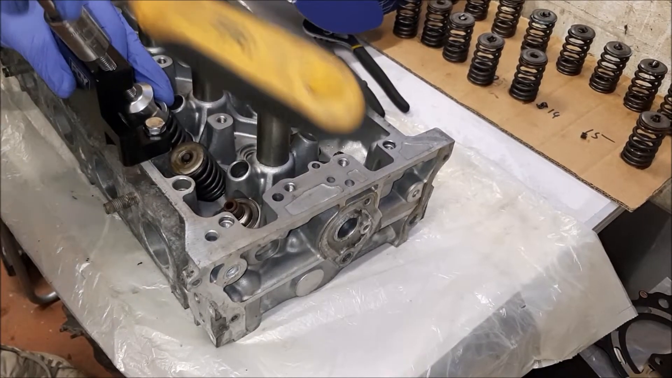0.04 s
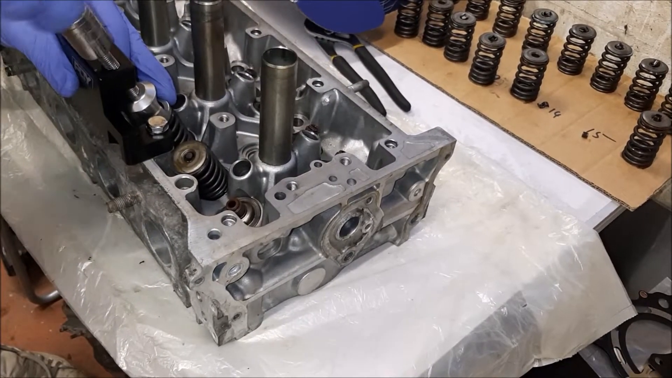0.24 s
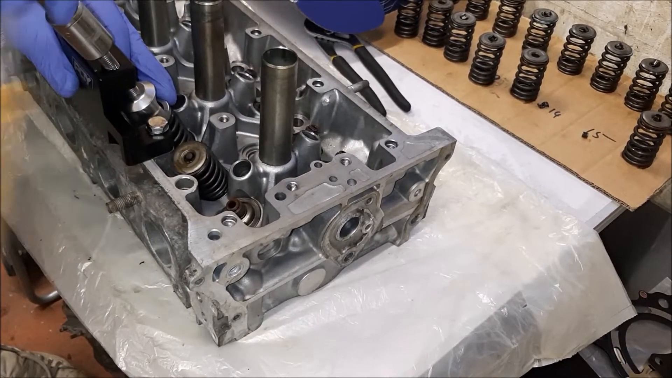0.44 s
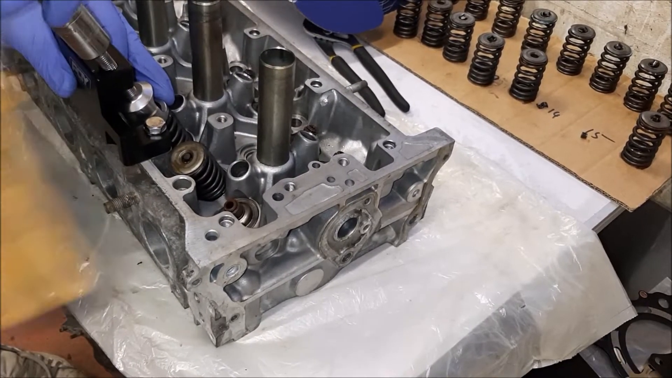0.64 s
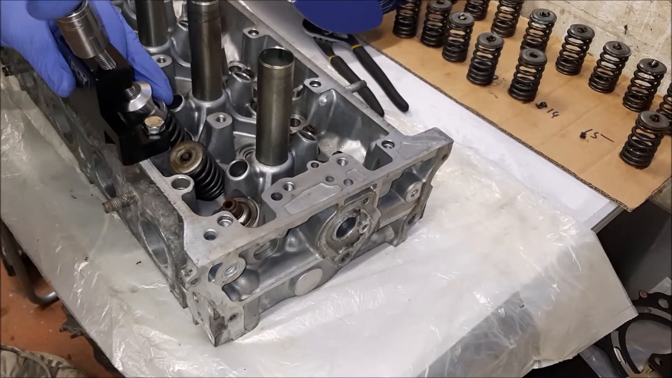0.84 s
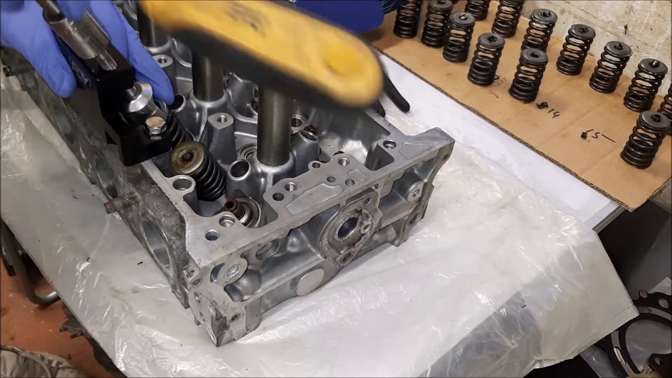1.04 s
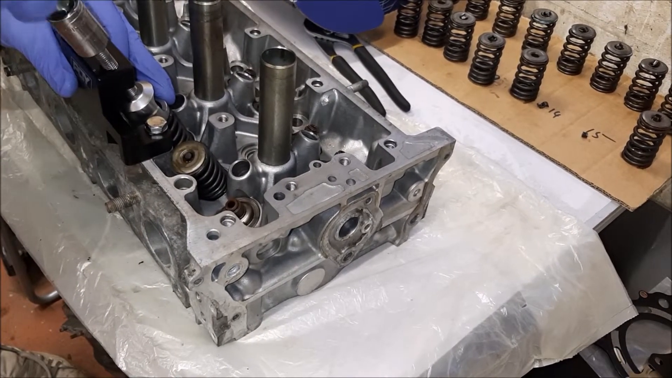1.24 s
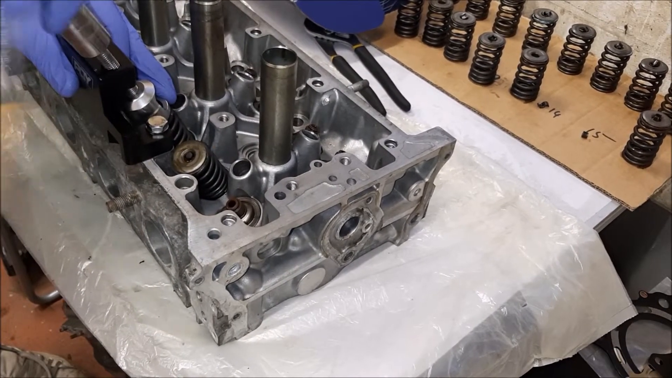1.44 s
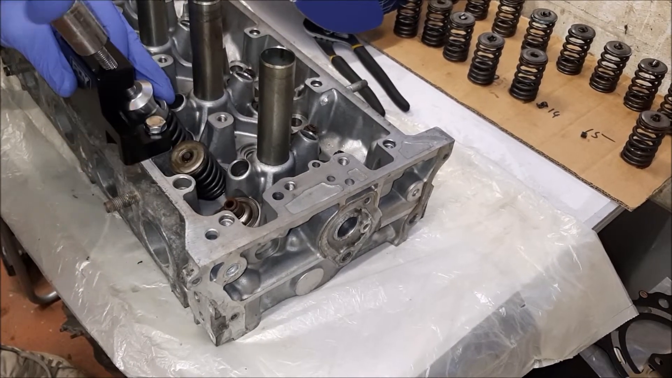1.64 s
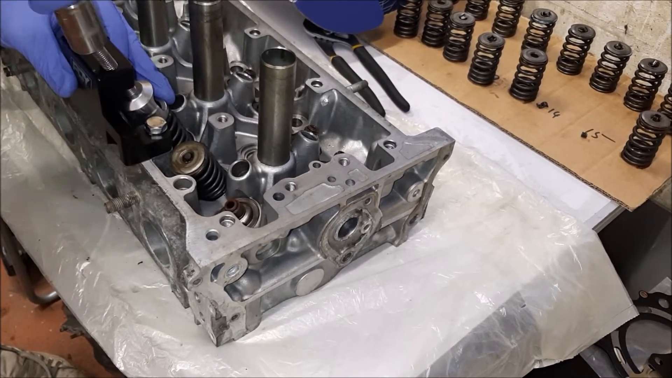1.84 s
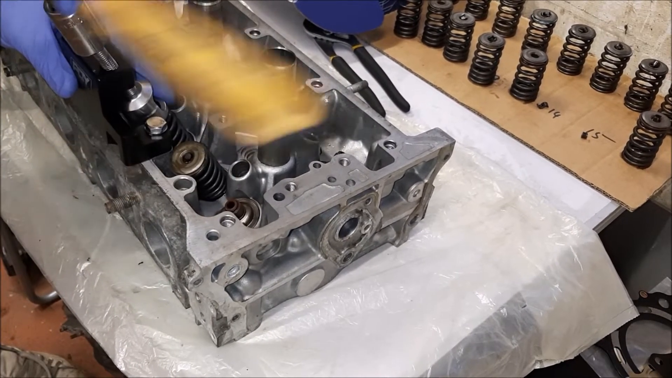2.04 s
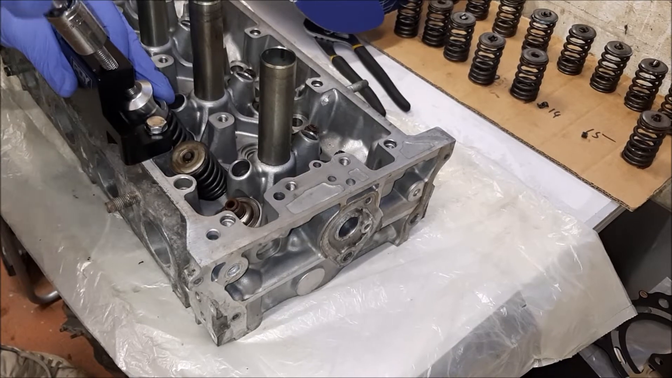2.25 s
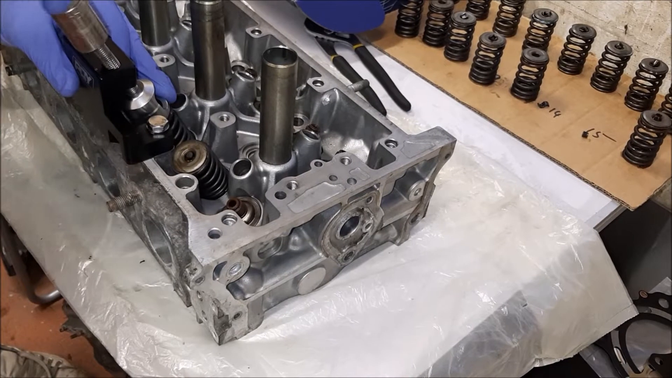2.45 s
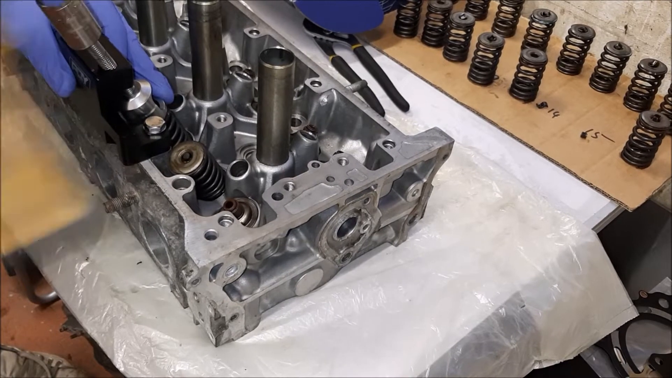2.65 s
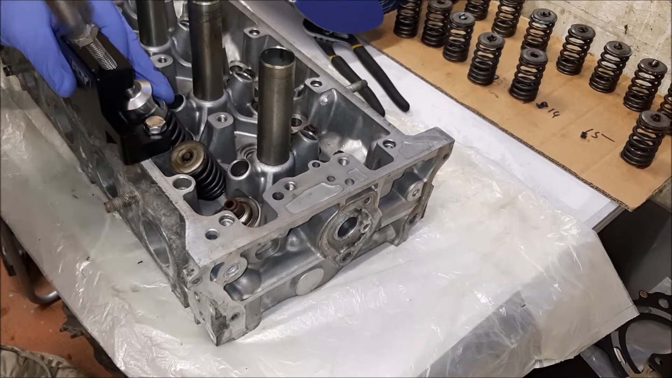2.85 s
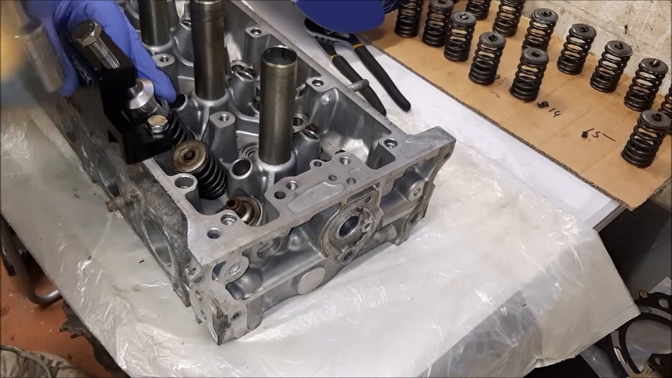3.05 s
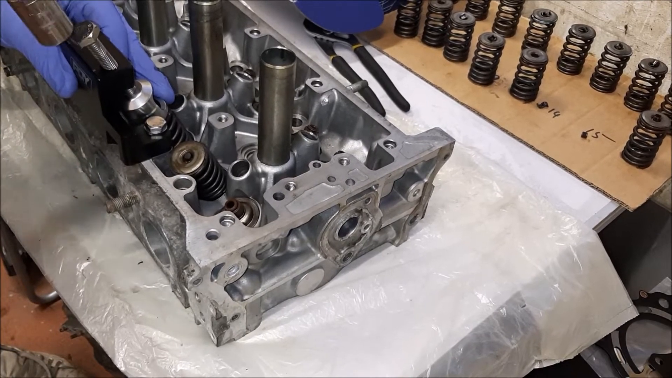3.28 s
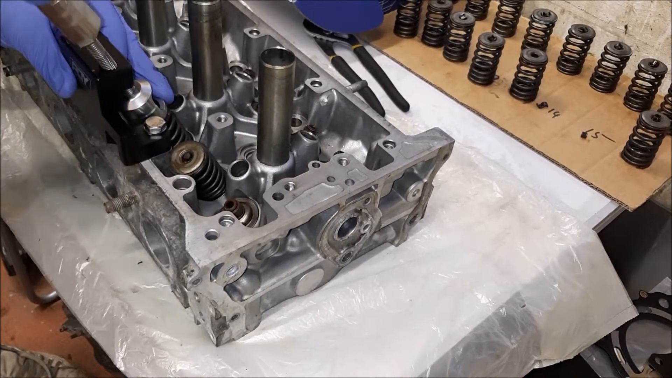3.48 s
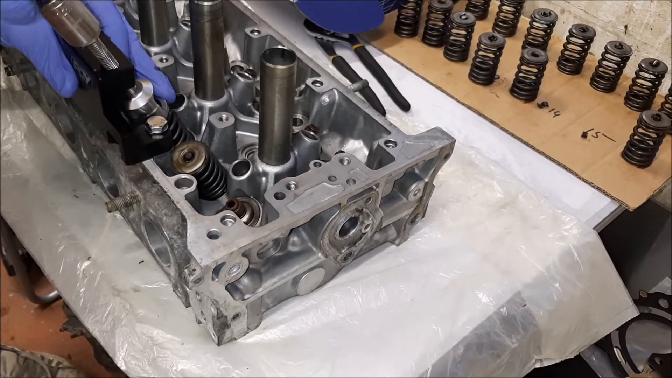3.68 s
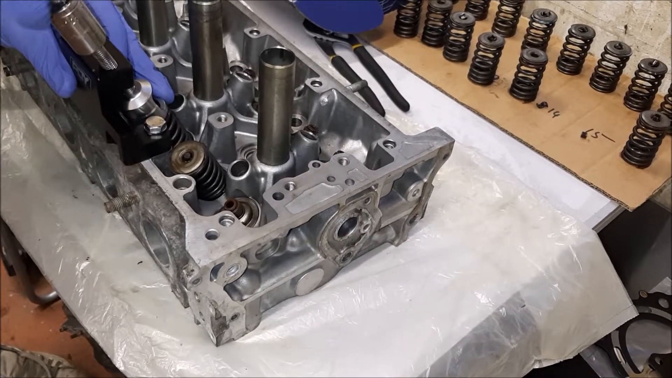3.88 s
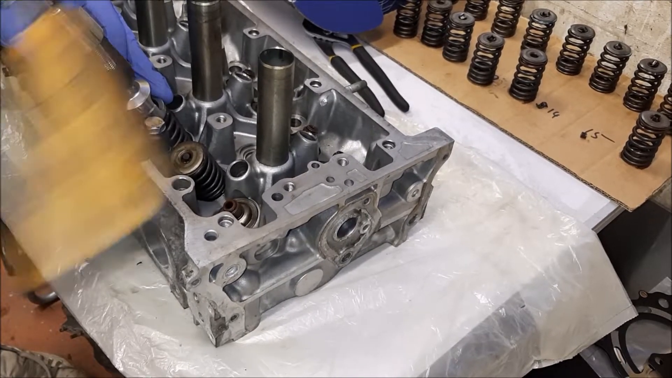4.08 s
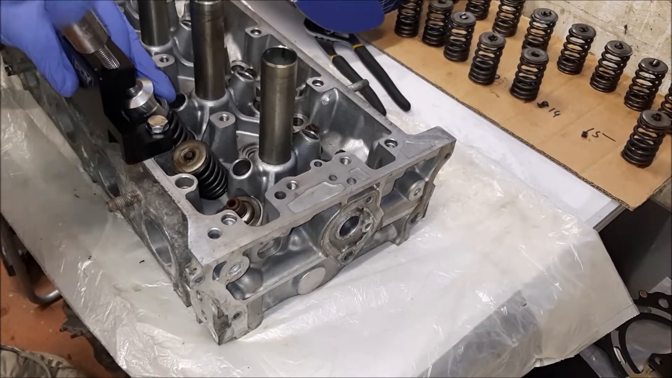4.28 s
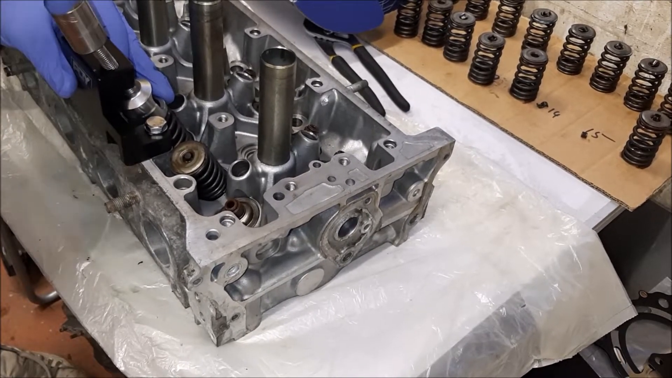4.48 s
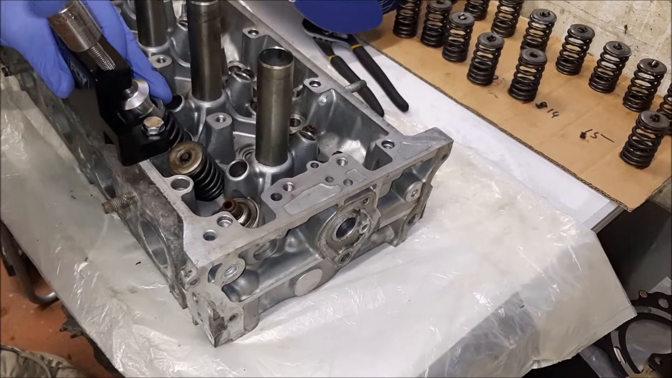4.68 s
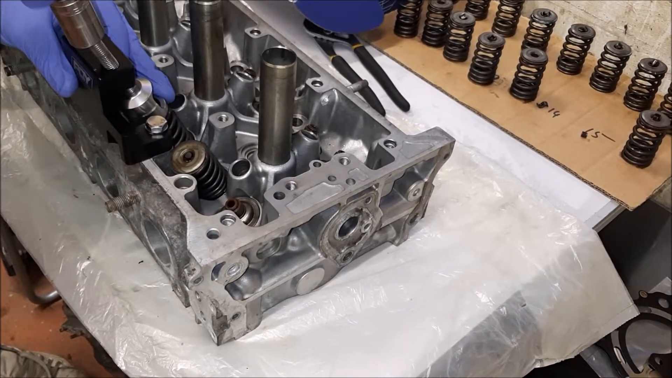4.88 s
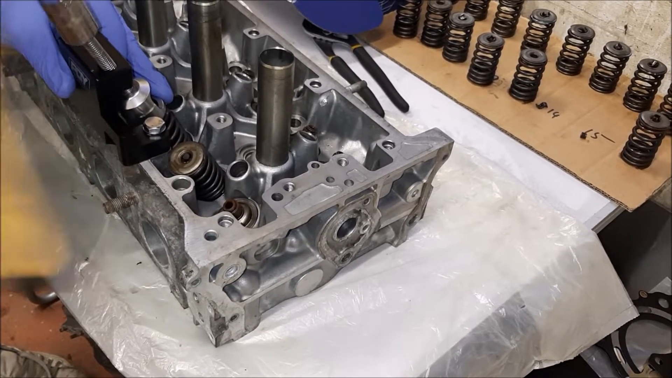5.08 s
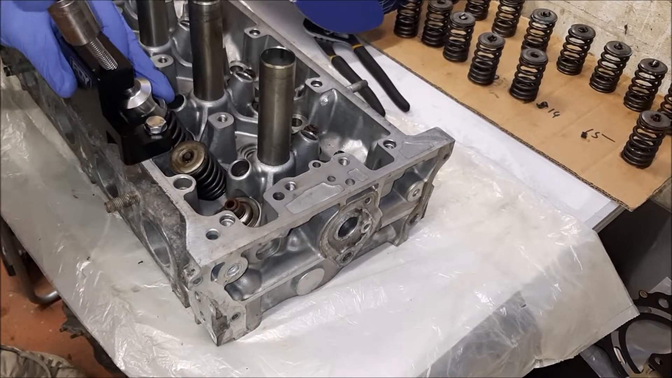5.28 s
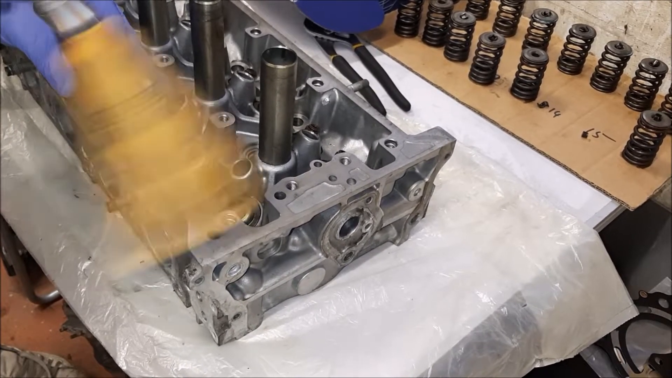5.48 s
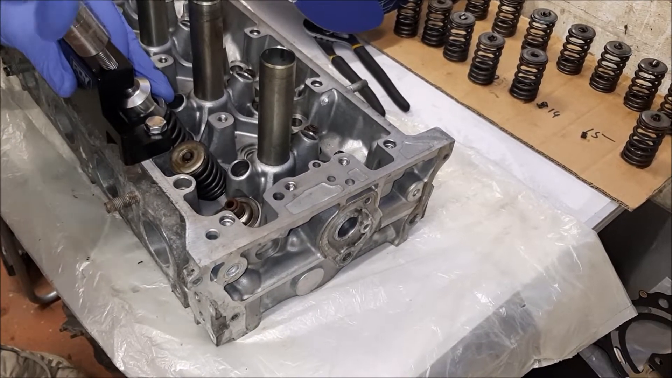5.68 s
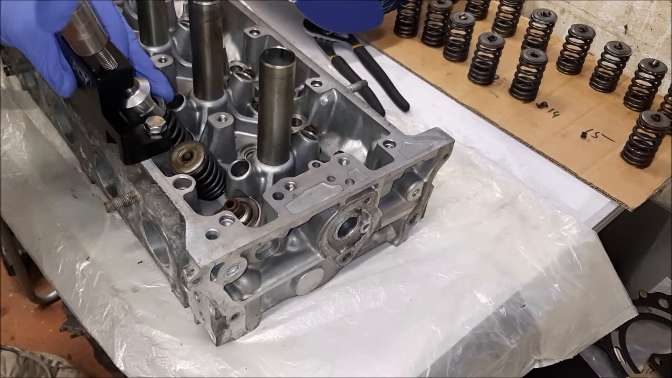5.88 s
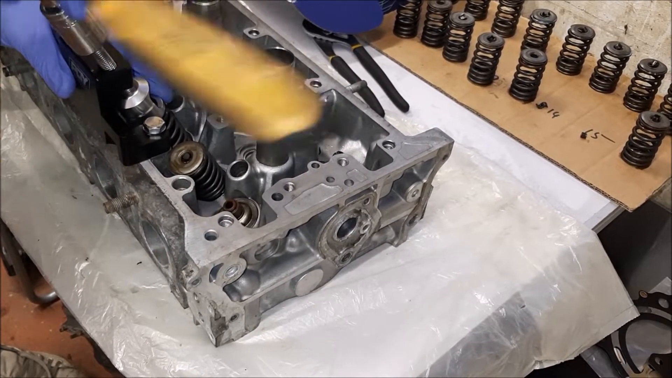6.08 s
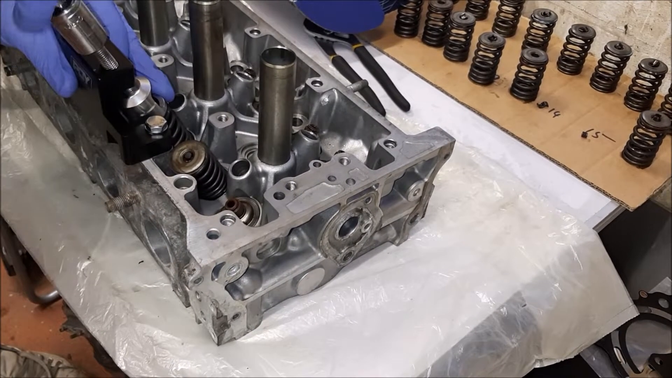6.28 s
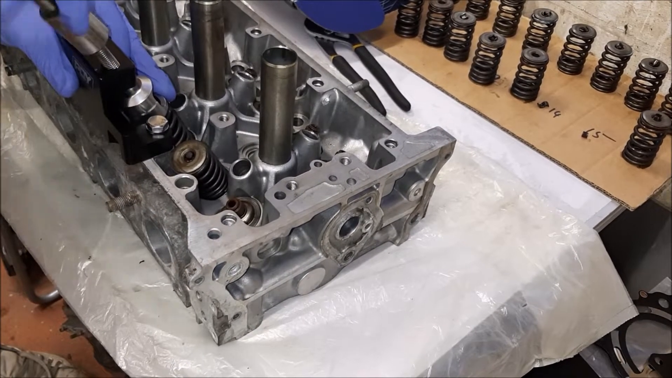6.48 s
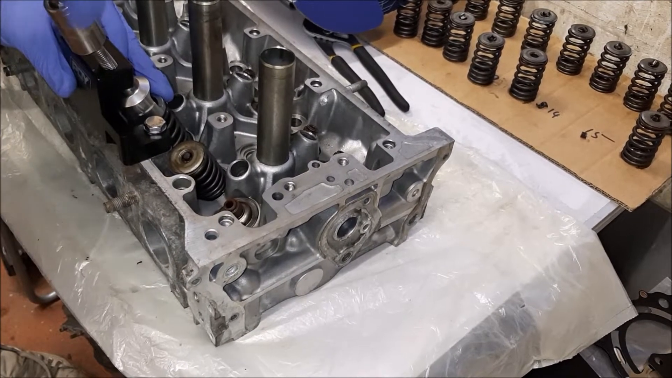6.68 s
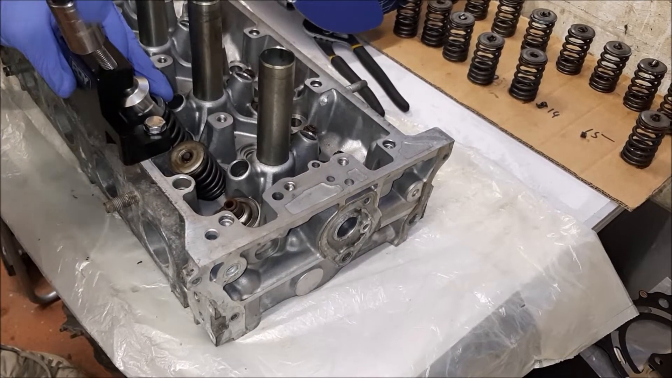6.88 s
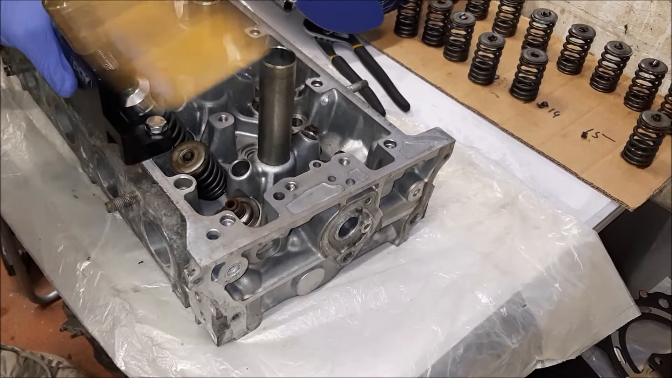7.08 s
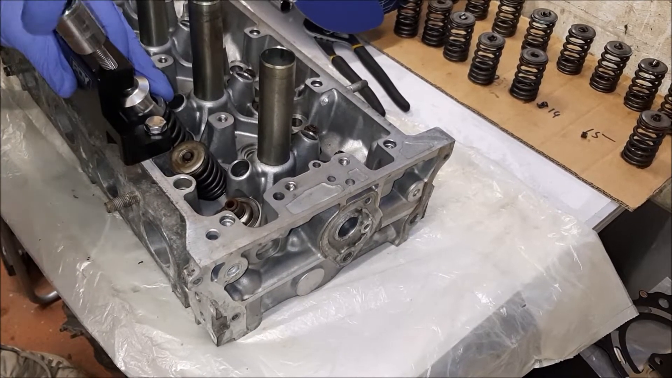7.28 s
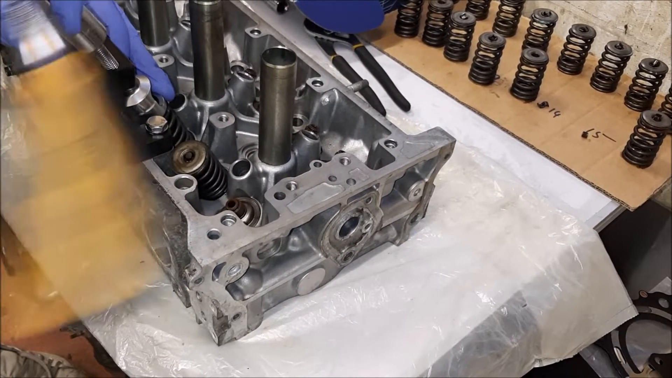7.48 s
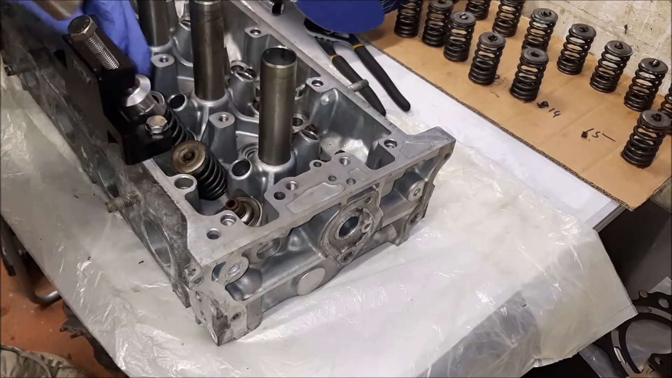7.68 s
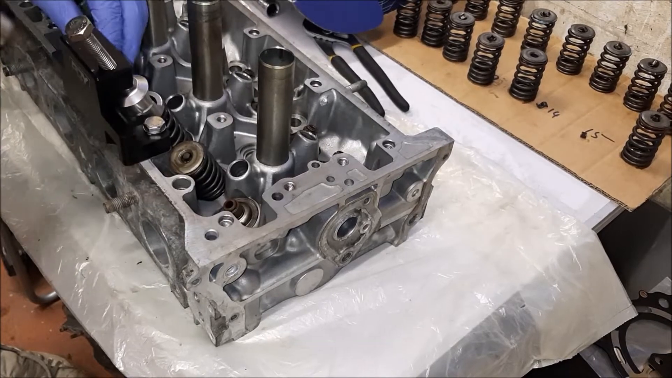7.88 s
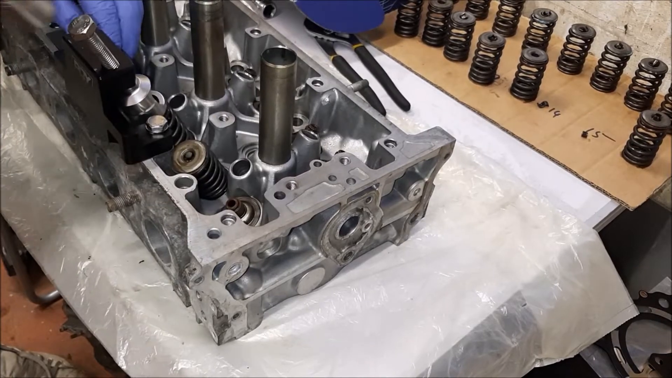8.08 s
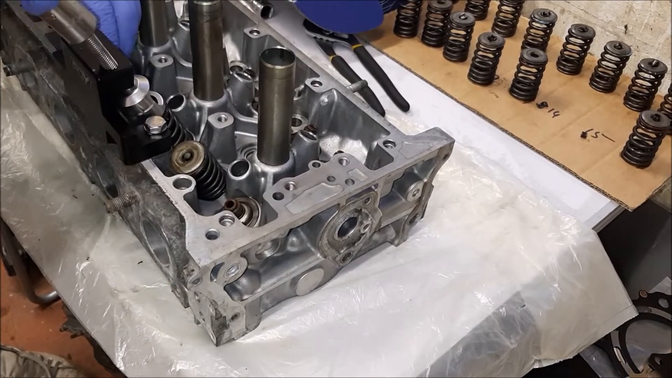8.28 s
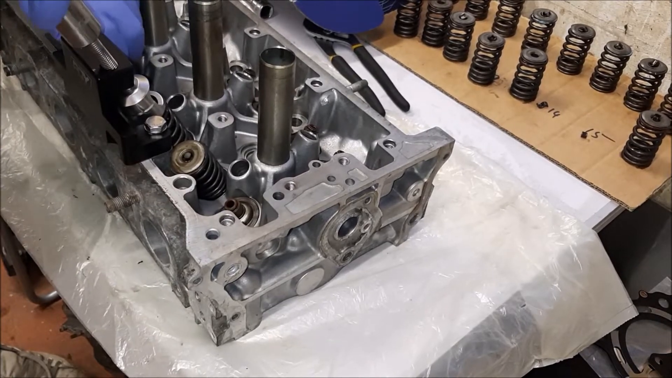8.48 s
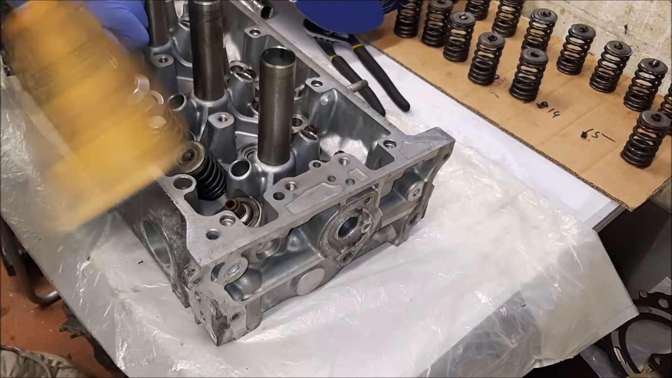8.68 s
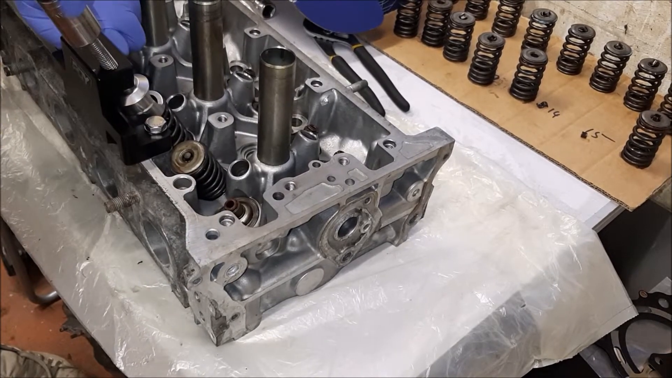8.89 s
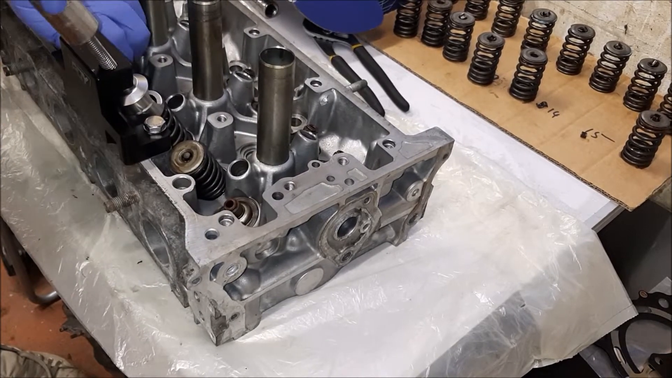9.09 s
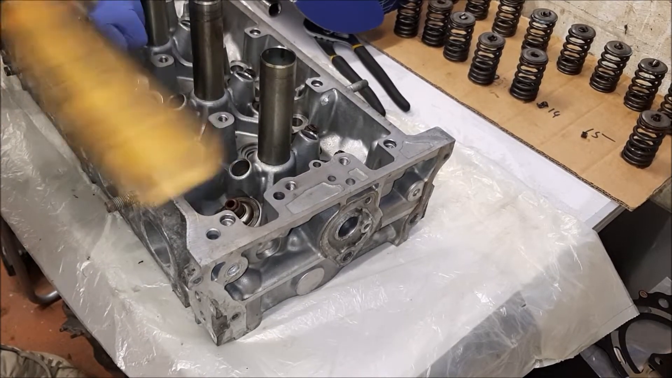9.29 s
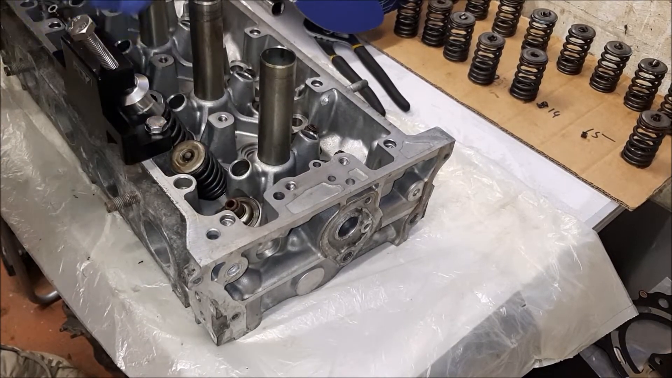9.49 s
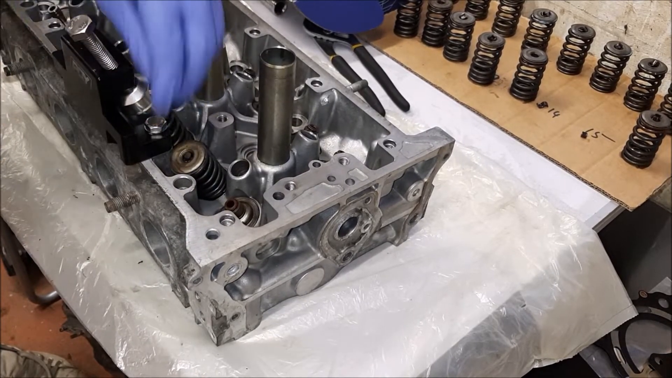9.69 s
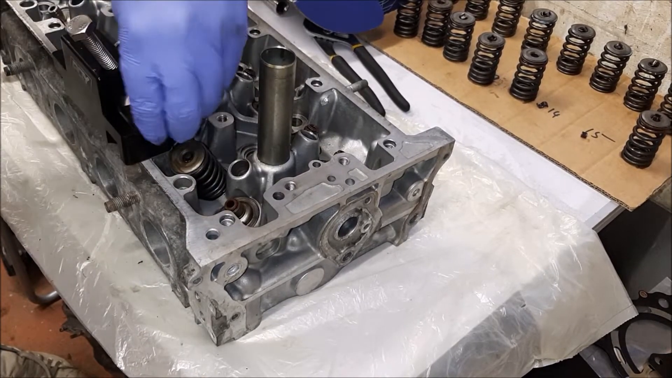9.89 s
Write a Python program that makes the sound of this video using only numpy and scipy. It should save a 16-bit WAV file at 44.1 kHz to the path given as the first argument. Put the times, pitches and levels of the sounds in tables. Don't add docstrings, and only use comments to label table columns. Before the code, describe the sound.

Close stereo pickup in a small hard garage. A steel valve is ground by hand in an alloy cylinder head: short crisp gritty rasps, about two a second, each starting with a sharp crack and fading into a light return drag. Low bench thumps follow the hand. After six strokes come clinks and a set-down pause, then seven more strokes, scattered taps, one final stroke and near silence.

```python
import sys
import numpy as np
from scipy import signal
from scipy.fft import rfft, irfft, next_fast_len
from scipy.io import wavfile
from scipy.ndimage import uniform_filter1d

SR = 44100
rng = np.random.default_rng(int(sys.argv[2]) if len(sys.argv) > 2 else 0)


def amplitude_ratio(level_db):
    exponent = np.asarray(level_db, float) / 20
    return 10 ** exponent


def log_audio(samples):
    frames = np.atleast_2d(samples).T
    limited = np.clip(frames, -1, 1)
    pcm = np.round(limited * 32767).astype(np.int16)
    wavfile.write(sys.argv[1], SR, pcm)


N = 438354


def unit(x):
    return x / np.sqrt(np.mean(np.abs(x) ** 2) + 1e-20)


def along(points, hz):
    f, v = np.transpose(points)
    return np.interp(np.log(hz + 1), np.log(f + 1), v)


def filtered(x, response):
    m = next_fast_len(N + SR // 2)
    return irfft(rfft(x, m) * response(np.fft.rfftfreq(m, 1 / SR)), m)[..., :N]


def modes(rows, f):
    total = 0
    for k, (centre, width, db) in enumerate(rows):
        damping = 1j * f * width
        total = total + (-1) ** k * amplitude_ratio(db) * damping / (centre * centre - f * f + damping)
    return total


def smooth(t, level):
    return np.interp(np.arange(N) / SR, t, 20 * np.log10(level + 1e-7))


def grit(per_s, spread_db, t60, bed):
    size_db = spread_db * np.minimum(rng.exponential(size=N), 3.3)
    cracks = (rng.random(N) < per_s / SR) * amplitude_ratio(size_db)
    bursts = signal.lfilter([1], [1, -10 ** (-3 / (t60 * SR))], cracks)
    return unit(bed + unit(bursts))


def patchy(depth_db):
    noise = rng.standard_normal((2, N))
    if not depth_db:
        return noise
    z = signal.stft(noise, nperseg=512)[2]
    field = uniform_filter1d(rng.standard_normal(z.shape[1:]), 6, 0)
    field = uniform_filter1d(field, 14, 1)
    return signal.istft(z * unit(amplitude_ratio(depth_db * unit(field))), nperseg=512)[1][:, :N]


# f/Hz, coherence (0-1)
COHERENCE = [(40, .7), (130, .95), (290, .85), (640, .5), (1400, .15), (3000, 0)]


def excited(strength, response, patchy_db=0):
    f = np.fft.rfftfreq(2 ** 14, 1 / SR)
    shape = unit(response(f) + 0j)
    turn = np.arccos(np.clip(along(COHERENCE, f), -1, 1)) / 2

    def mid_side(hz):
        return np.array([np.interp(hz, f, shape * np.cos(turn)), np.interp(hz, f, shape * np.sin(turn))])

    mid, side = filtered(strength * patchy(patchy_db), mid_side)
    return np.array([mid + side, mid - side])


# f/Hz, density/dB per Hz
HISS = [(15, -39.5), (25, -5), (135, 1.5), (400, -16.5), (600, -20), (1800, -25.5), (6000, -18.5),
        (10000, -22), (14000, -13), (16500, -18.5)]


def hiss():
    return excited(amplitude_ratio(-79), lambda f: amplitude_ratio(along(HISS, f)))


# f/Hz, T60/s
GARAGE = [(150, .38), (1000, 0.38), (5000, 0.29), (14000, 0.04)]


def garage(x):
    hz, t, z = signal.stft(rng.standard_normal((2, SR // 2)), SR, nperseg=256)
    decay = amplitude_ratio(-60 * t / along(GARAGE, hz)[:, None])
    tail = signal.istft(z * decay, SR, nperseg=256)[1]
    delayed = np.pad(x, ((0, 0), (200, 0)))
    return signal.fftconvolve(delayed, tail / np.linalg.norm(tail[0]), axes=1)[:, :N]


# t/s, boom level/dB,
# length/s
SHOVES = [(0.01, -43, .06), (.4, -54.5, 0.26), (.86, -50.5, 0.057), (1.06, -56.5, 0.098),
          (1.32, -56.5, 0.41), (1.55, -50.5, 0.049), (1.8, -55, 0.34), (2.08, -51.5, 0.13),
          (2.39, -46.5, 0.051), (2.52, -50.5, 0.24), (2.84, -47.5, 0.037), (3.0, -53, 0.16),
          (3.3, -69.5, .16), (3.62, -51.5, 0.015), (3.76, -53.5, 0.071), (3.97, -59, 0.094),
          (4.19, -53, 0.033), (4.44, -51.5, 0.097), (4.7, -54, 0.12), (4.94, -49.5, 0.15),
          (5.29, -49.5, 0.086), (5.75, -54, 0.3), (6.17, -61.5, 0.1), (6.45, -56.5, 0.13),
          (6.83, -52.5, 0.27), (7.2, -64.5, 0.31), (7.41, -51.5, .06), (7.62, -63, 0.13),
          (8.1, -64.5, 0.078), (8.37, -59, 0.019),
          (8.566, -53.5, 0.037),
    (8.75, -72, .06),
    (8.94, -62.5, 0.027),
    (9.113, -60.5, .08),
    (9.33, -83.5, 0.033),
    (9.62, -65, .045),
    (9.9, -87.5, .15),
]


def shoves():
    t = np.arange(0, N / SR + .004, .004)
    s, db, length_s = np.transpose(SHOVES)[:, :, None]
    away = np.abs((t - s) / length_s / np.where(t < s, .75, 1))
    return smooth(t, amplitude_ratio(db - 10 * away ** 1.4).sum(0))


# f/Hz, width/Hz
BOOM = (136.4, 15.2)
# f/Hz, level/dB
RUMBLE = [(20, -31), (45, -25), (62, -18.5), (90, -35), (180, -25.5), (220, -29.5), (300, -61)]
# f/Hz, width/Hz, level/dB
BOARD = [(256.5, 15, -4), (338, 59, -1.5), (432.6, 31, -2.5), (481, 25, -2), (730, 460, -9.5),
         (972, 37, 0.5)]
# t/s, peak level/dB, T60/s
THUDS = [
    (2.376, -27.5, 0.055),
    (3.194, -44, 0.48),
    (3.278, -45.5, 0.081),
    (6.129, -48, 0.19),
    (8.054, -47.5, 0.21),
    (8.087, -52.5, 0.11),
    (9.582, -56.5, 0.14),
    (9.61, -58, 0.12),
]


def bench(shake_db):
    boom_db = shoves()
    lumps = grit(per_s=45, spread_db=-3.5, t60=0.18, bed=0.96)
    t = np.arange(SR // 3) / SR
    bumps = np.zeros(N)
    for s, db, t60 in THUDS:
        bumps += np.pad(amplitude_ratio(db - 12.0 - 60 * t / t60), (round(s * SR), N))[:N]

    def low(f):
        return modes([(*BOOM, 0)], f) + amplitude_ratio(along(RUMBLE, f))

    def panel(f):
        return (modes(BOARD, f) + 0.23) / (1 + (210 / (f + 1)) ** 6) / (1 + (f / 780) ** 4)

    boom = excited(amplitude_ratio(boom_db + 0.6) * lumps ** 0.8, low)
    force = (amplitude_ratio(shake_db) + amplitude_ratio(boom_db - 9)) * lumps
    return boom + excited(force + bumps, panel)


# t/s, peak level/dB, f/Hz, T60/s
RINGS = [(0.849, -33.5, 1310, 0.08), (1.1508, -38, 1360, 0.069), (1.6237, -34.5, 1930, 0.018),
         (2.0253, -60, 1280, 0.06), (2.3615, -34, 1379, 0.12), (2.5651, -45, 1510, 0.065),
         (2.642, -35.5, 1380, 0.056), (2.9953, -47, 1340, 0.097), (3.5713, -39, 1985, 0.061),
         (3.655, -35, 1330, 0.067), (3.9225, -42, 1350, 0.1), (4.446, -43.5, 1420, 0.079),
         (5.2845, -26.5, 1395, 0.048), (5.3736, -30.5, 1310, 0.062), (5.5356, -48, 1437, 0.17),
         (5.6367, -41, 1244, 0.11), (5.924, -30.5, 1308, 0.07), (6.5296, -40.5, 1326, 0.052),
         (7.0339, -45, 1400, 0.053), (7.5047, -39.5, 1380, 0.067), (7.642, -48, 1434, 0.086),
         (8.3193, -36.5, 1340, 0.085), (8.3484, -31.5, 1255, 0.068), (8.389, -44, 1340, 0.26),
         (8.5709, -38.5, 1468, 0.057)]
# t/s, peak level/dB, f/Hz, T60/s
CHINKS = [
    (2.2414, -26, 3250, 0.028),
    (2.2706, -25, 2600, 0.049),
    (2.9936, -25, 5040, 0.072),
    (3.5712, -38.5, 2840, 0.08),
    (3.692, -23, 2910, 0.05),
    (6.02, -50, 2030, 0.16),
    (7.6664, -50, 4000, 0.049),
    (8.442, -21, 5140, 0.015),
    (9.3001, -52, 4670, 0.052),
    (9.318, -46.5, 4230, 0.048),
]
# t/s, peak level/dB, f/Hz, T60/s
SQUEAKS = [
    (.055, -47, 10300, .13),
    (4.0, -58, 9000, .15),
    (4.49, -48, 10400, .1),
    (7.03, -56, 2790, .12),
    (7.99, -78, 2030, 1),
    (9.44, -77, 2030, .8),
    (9.54, -77, 4920, 1.6),
]


def rings():
    out = np.zeros((2, N + SR))
    rows = [*RINGS, *CHINKS, *SQUEAKS]
    for (s, db, hz, t60), (a, b, c) in zip(rows, rng.random((len(rows), 3))):
        t = np.arange(round(min(t60, 1) * SR)) / SR
        turn = np.array([[0], [4 * a - 2]])
        apart = (3.6 + 7 * np.array([b, c])) / t60

        def note(off_hz, phase):
            return np.sin(2 * np.pi * (hz + off_hz) * t + phase)

        cluster = note(0, turn) + 0.82 * note(apart[0], -turn) + 0.59 * note(-apart[1], 2 * turn)
        envelope = amplitude_ratio(db - 4.5 - 60 * t / t60) * (1 - np.exp(-t / 0.00031))
        out[:, round(s * SR):][:, :len(t)] += envelope * cluster
    return out[:, :N]


# t/s, peak level/dB
BREAKS = [(0.185, -23), (0.705, -25.5), (1.206, -26), (1.6752, -18.5), (2.1535, -17.5), (2.667, -22.5),
          (4.2449, -22), (4.7136, -21), (5.178, -28.5), (5.664, -22), (6.1986, -21.5), (6.6972, -29),
          (7.1623, -26), (8.911, -20)]
# t/s, peak level/dB
TICKS = [(0.1516, -39.5), (0.6892, -60), (1.152, -48), (1.626, -45), (2.023, -42), (2.123, -41),
         (2.6418, -41), (4.2115, -40), (4.917, -31), (5.143, -39.5), (5.63, -40), (6.13, -61.5),
         (6.65, -43.5), (7.137, -36.5), (8.8446, -50), (8.8717, -47)]
# t/s, peak level/dB
SNAPS = [(2.1775, -26.5), (2.6564, -48.5), (4.2661, -21.5), (5.687, -40), (7.201, -27), (8.4828, -27),
         (8.5089, -21), (7.401, -38), (9.046, -21.5)]
# t/s, knock level/dB, drag level/dB, fade/dB per s, grit/dB
TAPS = [(1.151, -64, -57, 93, -4.5), (1.6272, -66.5, -55, 80, -9.5), (1.96, -70, -65, 118, -3),
        (2.9926, -21, -38.5, 250, -2.5), (3.15, -77, -79.5, 107.5, -4), (3.5718, -39, -53.5, 84, -13.5),
        (3.6932, -25, -40.5, 190, -11.5), (3.9229, -38, -55, 81, -0.5), (5.373, -33.5, -84, 261, -26.5),
        (8.8877, -30.5, -49, 150, 6.5), (6.526, -53, -61, 252.5, 2.5), (7.504, -75, -77, 92, -15),
        (7.638, -57, -59, 141.5, -11.5), (8.0509, -53.5, -67, 137, 4), (8.322, -32.5, -46, 163, -10),
        (8.4416, -26.5, -42, 113, 4), (8.51, -70, -55.5, 119, -2), (9.298, -61, -67, 82.5, -6.5),
        (9.48, -74, -79, 13, 6)]


def knocks():
    t = np.arange(SR // 4) / SR
    shape = amplitude_ratio(-60 * t / np.array([[.03], [.018], [.04]])) + 0.92 * amplitude_ratio(-60 * t / 0.0054)
    # fizz level/dB, body level/dB
    rows = [(*r, -7, -14.5) for r in BREAKS]
    rows += [(*r, -17, 0) for r in TICKS]
    rows += [(*r, -5.5, -23) for r in SNAPS]
    rows += [(r[0], r[1], r[4] - 12, -3) for r in TAPS]
    out = np.zeros((3, N + SR))
    for s, db, fizz_db, body_db in rows:
        peak = amplitude_ratio(db - 8.5 + np.array([[0], [fizz_db], [body_db]]))
        out[:, round(s * SR):][:, :len(t)] += peak * shape
    return out[:, :N]


# t/s, length/s, rasp level/dB, lean towards the valve head/dB, weight of the hand/dB
STROKES = [(-0.3, 0.18, -29, -1.5, 0.5), (0.182, 0.15, -32, -0.3, 0), (0.705, .14, -32, 0, 1.5),
           (1.2, 0.14, -30.5, 0.5, -2.5), (1.679, 0.12, -30.5, -0.5, 3), (2.1567, 0.14, -30.5, -.4, -1.5),
           (2.664, 0.1, -31, -0.8, -1.5), (4.2397, .13, -31, -1, -2.5), (4.707, 0.13, -31.5, 2, -2),
           (5.169, 0.068, -31.5, 2.5, 1.5), (5.676, 0.17, -32.5, 1.9, -0.5), (6.196, .15, -31, 1.5, -3.5),
           (6.6904, 0.12, -30, 3, -1.5), (7.1656, 0.14, -30, 2, -3.5), (8.904, 0.11, -32.5, -1.5, -12)]


def motion():
    step_s = .001
    t = np.arange(0, N / SR + step_s, step_s)
    s, length, db, lean_db, weight_db = np.transpose(STROKES)[:, :, None]
    u = t - s
    after = np.maximum(u - length, 0)
    swell = -3.5 * np.exp(-np.abs(u / 0.015))
    warm = -1.5 * np.exp(-np.abs(u / 0.017))
    lift = 400.5 * np.maximum(u - .41, 0)
    turning = amplitude_ratio(swell + warm - 24 * u - 202 * after)
    back = amplitude_ratio(-25 + .6 * np.minimum(weight_db, 0) - 42.5 * u - lift)
    creep = amplitude_ratio(-23 + 201 * u + 400.5 * np.minimum(u + 0.023, 0))
    turn = amplitude_ratio(db) * np.where(u < 0, creep, turning + back)

    start_db, end_db = -15.5, 5
    loading = end_db + (start_db - end_db) * np.exp(-np.abs(u / 0.24) ** 1.52)
    load_db = np.where(u < 0, 0, loading) + 0.5 * weight_db
    shake = (u > 0) * amplitude_ratio(db + weight_db - 19.5 + 2.3 * swell - 69 * after - lift)

    s, _, db, fade, grit_db = np.transpose(TAPS)[:, :, None]
    v = np.maximum(t - s, 0)
    drag = amplitude_ratio(db - fade * v) * np.minimum(v / 0.0083, 1)
    thin_db = 2 * np.maximum(grit_db, 0)

    def mix(stroke_db, tap_db):
        return smooth(t, (turn * amplitude_ratio(stroke_db)).sum(0) + (drag * amplitude_ratio(tap_db)).sum(0))

    rasp_db = mix(0, 0)
    body_db = mix(load_db, -4.5 - thin_db) - rasp_db
    fresh_db = mix(0, grit_db) - rasp_db
    head_db = mix(lean_db, .8) - rasp_db
    shake_db = smooth(t, shake.sum(0) + (amplitude_ratio(-4.5 - thin_db) * drag).sum(0))
    return rasp_db, body_db, fresh_db, head_db, shake_db


# f/Hz, density/dB per Hz
RASP = [(410, -38), (760, -15), (950, -8), (1400, -5.5), (1700, -5.5), (3150, -3.5), (3600, -5), (4300, -5),
        (5000, -1.5), (5900, -6), (7000, -4), (10500, -6), (13000, -4), (16000, -7.5)]
# f/Hz, width/Hz, level over the rasp/dB
CASTING = [(1340, 93, -1), (1510, 36, 9), (2011, 26, 4.5), (2324, 64, 6.5), (2580, 6.6, -1), (3017, 15, 0),
           (3304, 30, -1.5), (4870, 19, 8)]


def valve(rasp_db, body_db, grit_db, lean_db):
    fizz_db = -3.5 + 0.069 * (rasp_db + 33.5) + grit_db
    bite_db = lean_db + 0.51 * np.clip(body_db + 8.5, -8, 8)
    rasp_blows, fizz_blows, body_blows = knocks()
    grains = grit(per_s=420, spread_db=3.8, t60=.006, bed=1.35)

    def metal(f):
        return amplitude_ratio(along(RASP, f)) * (1 + modes(CASTING, f))

    def below(f, edge_hz):
        return 1 / (1 + (f / edge_hz) ** 10)

    scrape = amplitude_ratio(rasp_db + 1.5) * grains + rasp_blows
    fizzing = amplitude_ratio(rasp_db + fizz_db + 2.5) * grains + fizz_blows
    loading = amplitude_ratio(rasp_db + body_db + 2.0) * grains ** 1.1 + body_blows
    bite = excited(amplitude_ratio(bite_db - 5.0) * scrape,
                   lambda f: metal(f) * (below(f, 4510) - below(f, 2030)), patchy_db=3.5)
    rasp = excited(amplitude_ratio(-3.0) * scrape,
                   lambda f: metal(f) * (below(f, 8560) - below(f, 4460)), patchy_db=1.5)
    fizz = excited(fizzing, lambda f: metal(f) * (1 - below(f, 7940)), patchy_db=0.6)
    body = excited(loading, lambda f: metal(f) * below(f, 2244), patchy_db=2.0)
    return bite + rasp + fizz + body + rings()


def scene():
    *levels, shake_db = motion()
    work = valve(*levels)
    return hiss() + amplitude_ratio(-8.5) * garage(work) + bench(shake_db) + work


def top_cut(x):
    return signal.sosfilt(signal.butter(12, 16810, fs=SR, output="sos"), x)


# f/Hz, width/Hz, level/dB
NOTCH = (8810, 840, -9.5)
# f/Hz, left minus right level/dB
LEAN = [(60, -6), (110, -2.5), (200, -1), (380, -2.5), (700, -0.5), (1290, -0.5), (2380, 0.5), (4400, -2),
        (8120, 0.5), (15000, 2.5)]


def record(dry):
    hz, width, db = NOTCH
    top_hz, lag_s = 15700, np.array([[0], [.00013]])

    def port(f):
        dip_db = db * np.exp(-((f - hz) / width) ** 2)
        edge_db = -36 * np.clip((f - top_hz) / 200, 0, 1)
        lean_db = along(LEAN, f) * np.array([[.5], [-.5]])
        return amplitude_ratio(dip_db + edge_db) * np.exp(-2j * np.pi * f * lag_s) * amplitude_ratio(lean_db)

    return top_cut(filtered(dry, port))


dry = scene()
out = record(dry)
log_audio(out)
```